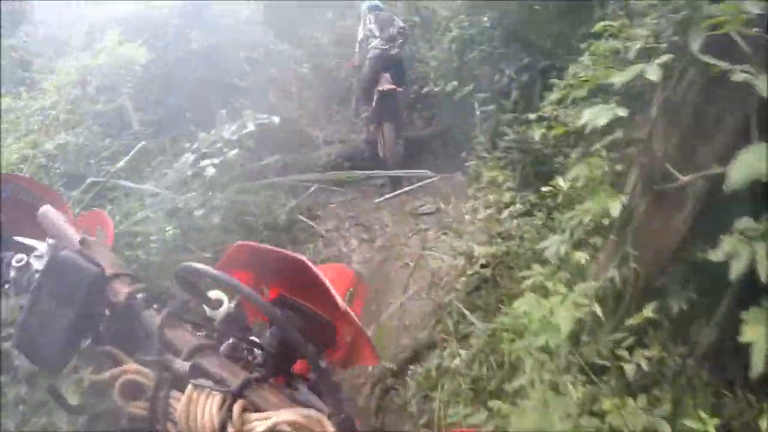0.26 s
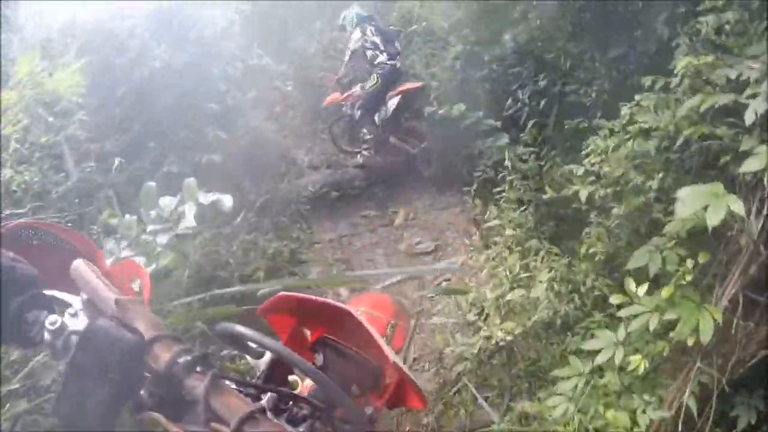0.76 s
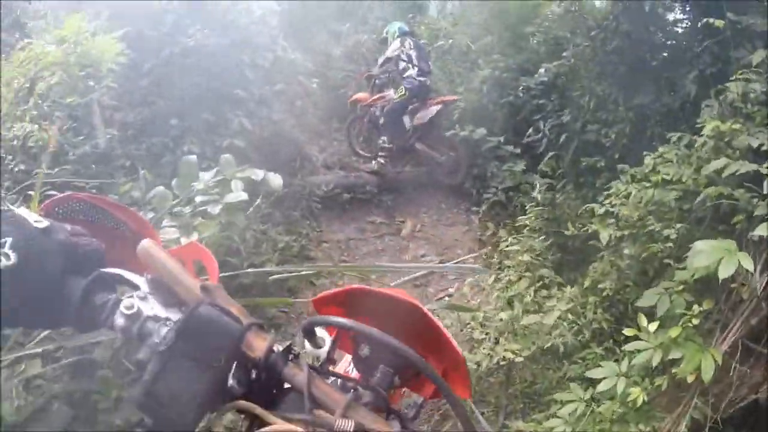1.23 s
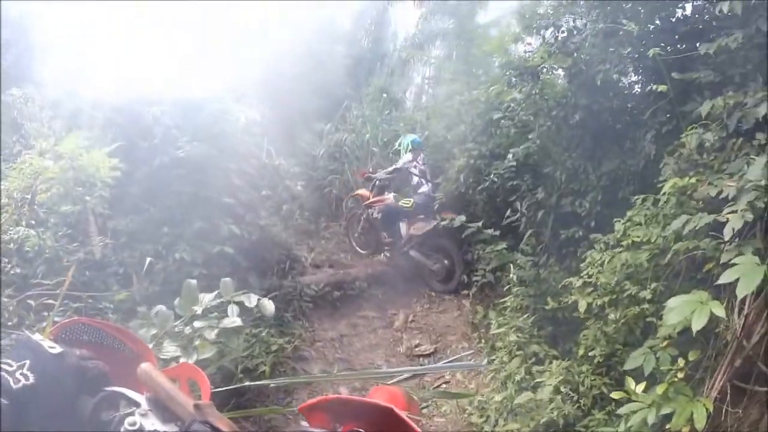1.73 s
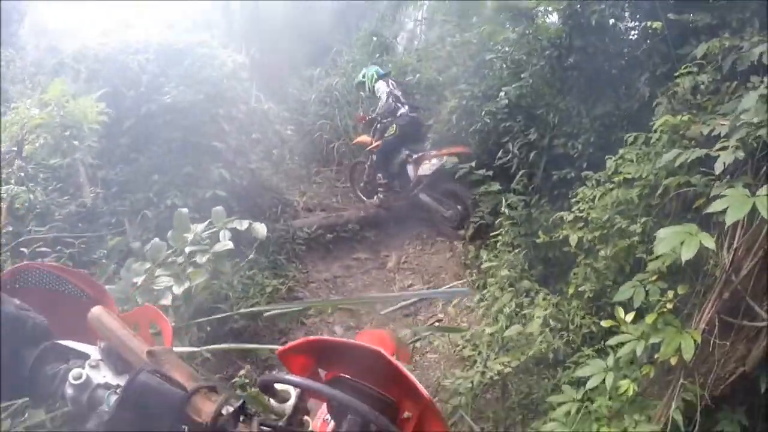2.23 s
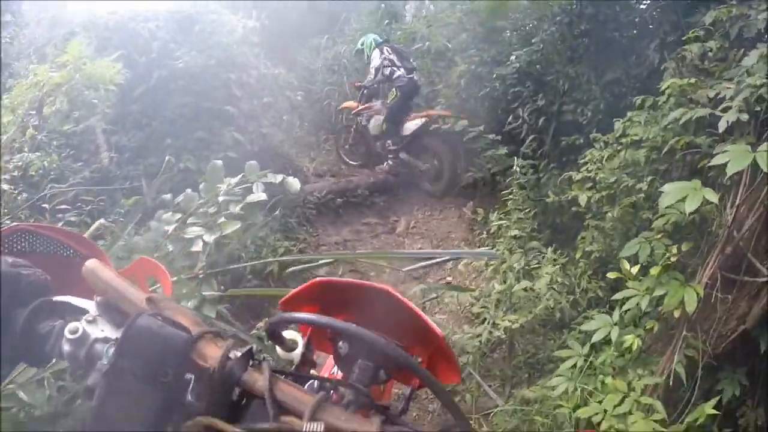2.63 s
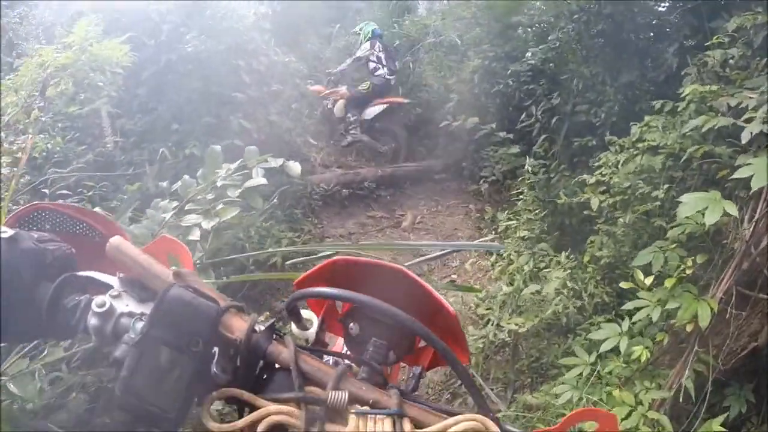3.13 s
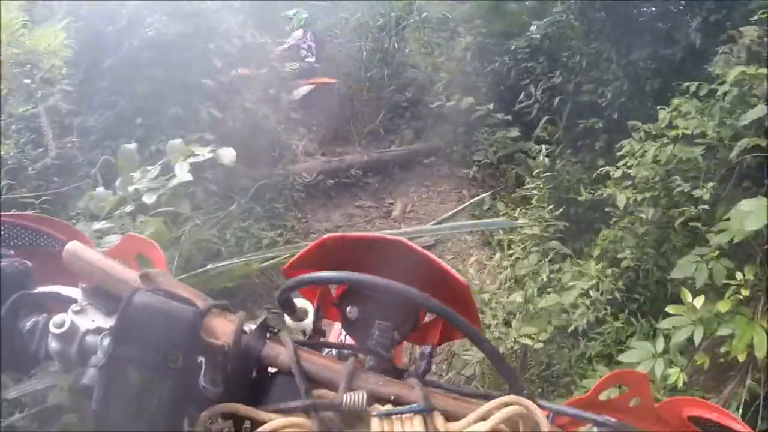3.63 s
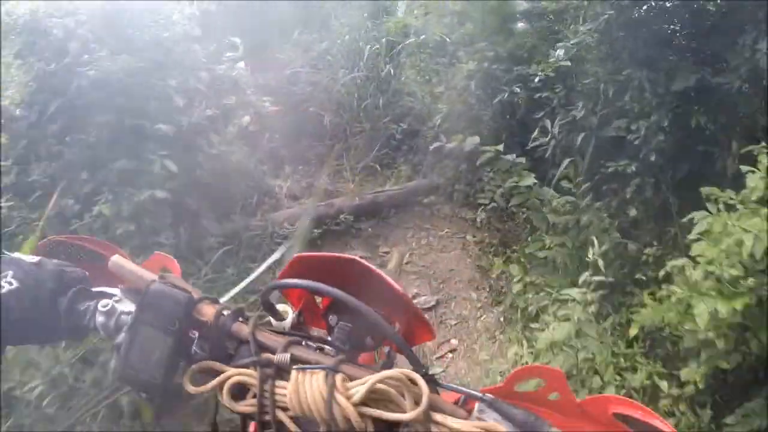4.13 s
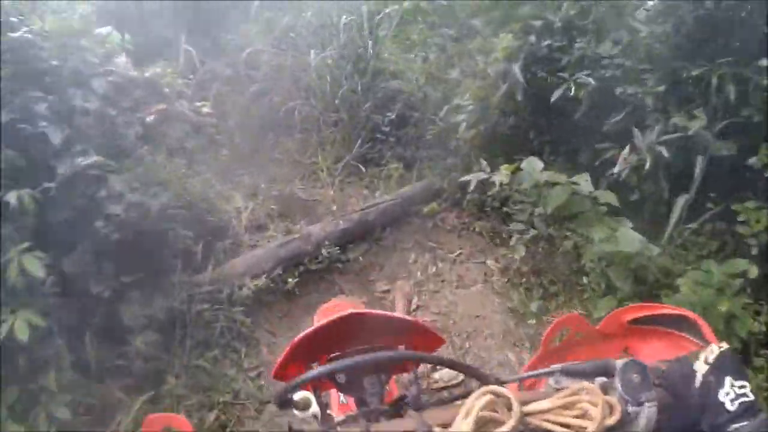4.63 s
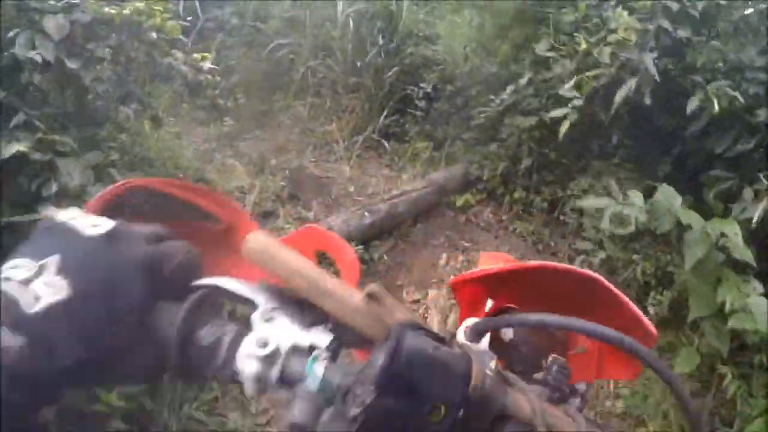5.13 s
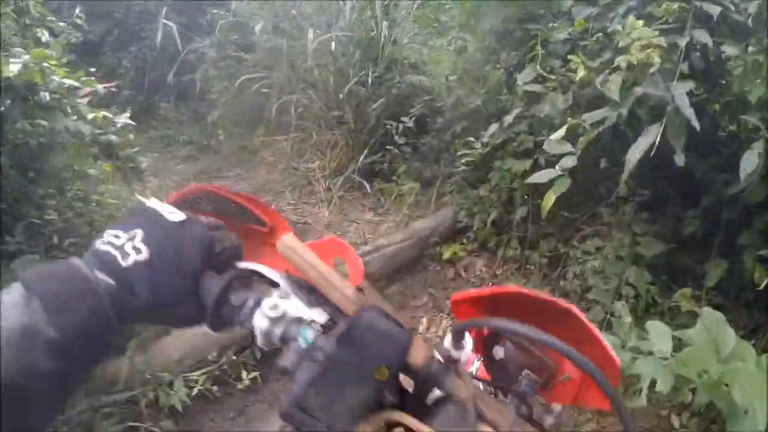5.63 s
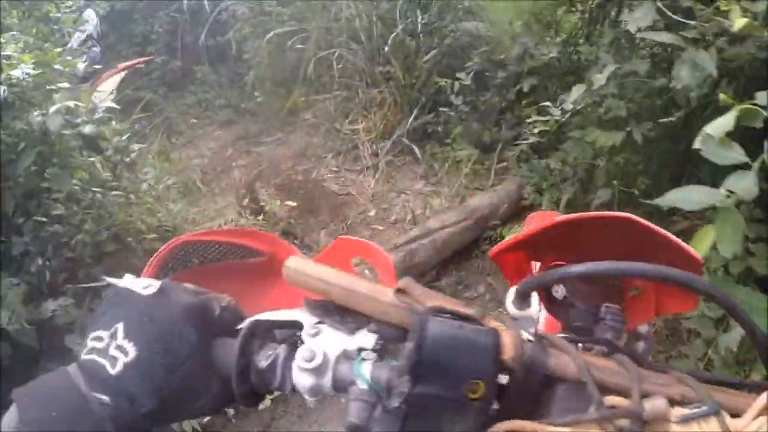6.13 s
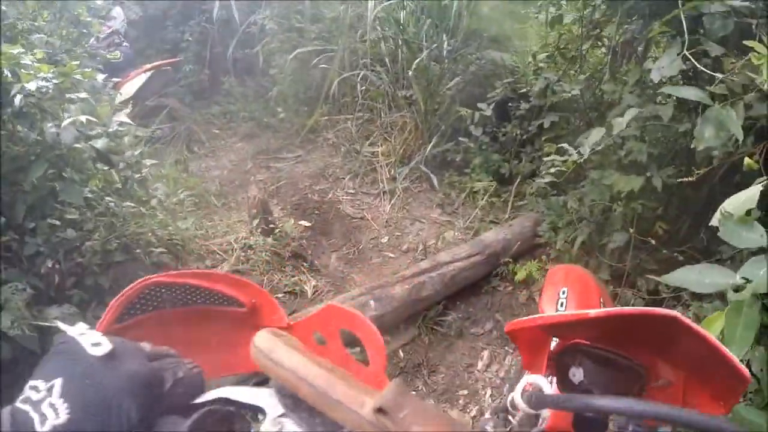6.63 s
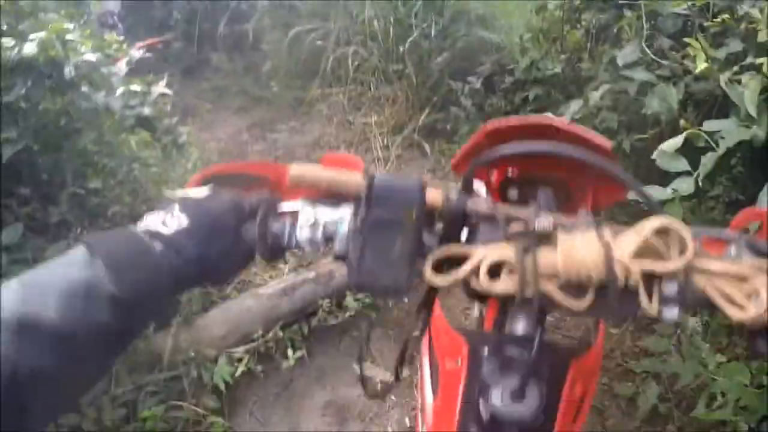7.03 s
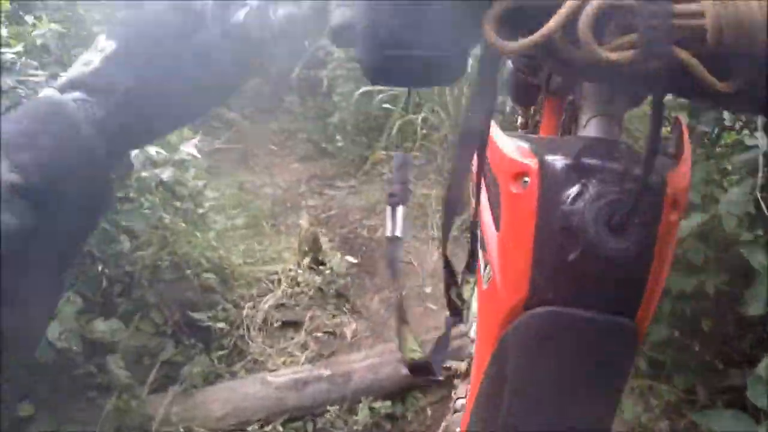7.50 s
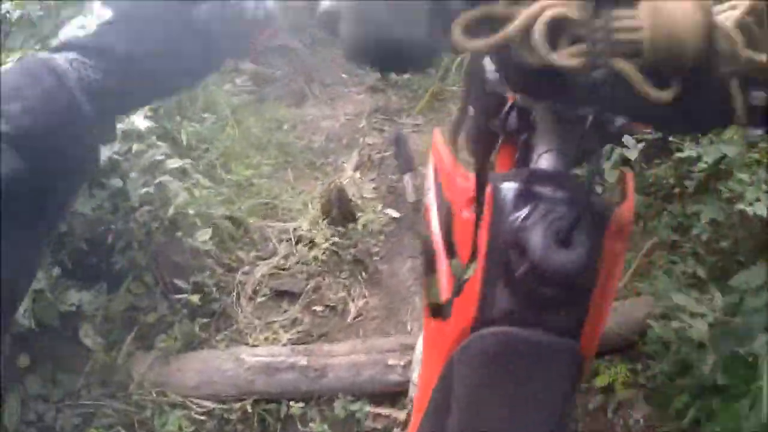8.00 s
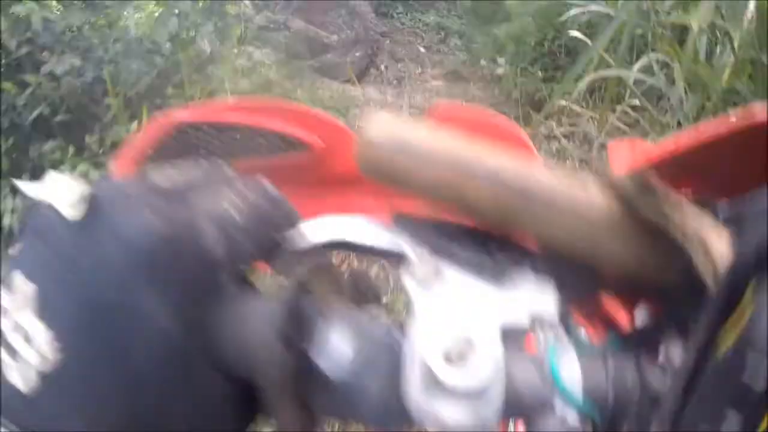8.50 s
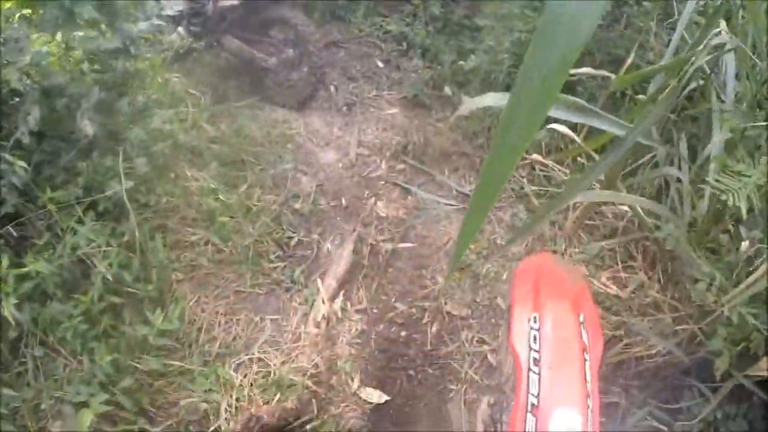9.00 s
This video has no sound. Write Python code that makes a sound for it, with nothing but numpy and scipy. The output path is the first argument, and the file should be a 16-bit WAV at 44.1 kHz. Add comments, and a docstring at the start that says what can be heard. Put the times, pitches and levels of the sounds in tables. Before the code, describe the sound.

Close dirt bike engine chugs at low speed as a second barks off into the distance, followed by throttle bursts, hard knocks and chain whirr.

```python
"""A two-stroke dirt bike idles and creeps up a forest trail, heard from a camera on its rider;
each firing thumps the exhaust and rattles the engine. A bike ahead barks over a log and is gone
by 3.5 s. A third buzzes far off from 1.4 s and again near 6 s. Then the near bike climbs the log:
it sways, clatters and thuds, the hardest knocks push the limiter down, and from 8 s the chain whirrs."""
import sys
import numpy as np
from scipy import signal
from scipy.fft import rfft, irfft
from scipy.io import wavfile
from scipy.ndimage import uniform_filter1d, minimum_filter1d

SR = 44100
rng = np.random.default_rng(int(sys.argv[2]) if len(sys.argv) > 2 else 0)


def transcribe(signal):
    """Save signal, clipped to [-1, 1], as a 16-bit WAV file at the path in sys.argv[1]."""
    frames = np.atleast_2d(signal).T
    limited = np.clip(frames, -1, 1)
    pcm = np.round(limited * 32767).astype(np.int16)
    wavfile.write(sys.argv[1], SR, pcm)


N = 408366

# far engine: (time [s], firing rate [Hz], level [dB])
FAR_ENGINE = [(1.4, 132, -72), (1.56, 133, -48.5), (1.72, 113, -44.5), (1.82, 122, -55), (1.88, 132, -51),
              (1.96, 127, -50), (2.11, 133, -47.5), (2.25, 141, -54), (2.36, 165, -49.5), (2.8, 150, -56),
              (3.1, 160, -87), (5.8, 130, -93), (5.94, 148, -50), (6.02, 172, -46.5), (6.25, 135, -58),
              (6.42, 140, -58), (6.66, 104, -60), (6.77, 136, -48), (6.95, 180, -70), (7.7, 181, -65),
              (7.8, 170, -55)]

# bike ahead, engine speed: (time [s], firing rate [Hz])
AHEAD_SPEED = [(0.0, 26.25), (0.34, 39.92), (0.55, 30.9), (0.66, 35.7), (0.74, 40.5), (0.83, 43),
               (0.97, 52), (1.1, 55.2), (1.3, 61.3), (1.43, 63.4), (1.64, 46.41), (2.22, 22.44),
               (2.39, 39.66), (2.62, 38.63), (2.72, 44.71), (2.86, 44.25), (3.12, 58.0), (3.42, 44.5)]
# its throttle: (opens [s], shuts [s], bark lift [dB], honk lift [dB])
AHEAD_THROTTLE = [(-0.05, 0.08, 7.5, 8), (0.255, 0.373, 13, 14.5), (0.62, 0.853, 11.5, 13.5),
                  (0.847, 1.37, 9, 10), (2.223, 2.42, 14.5, 6), (2.432, 2.624, 14.5, 14.5),
                  (2.59, 2.843, 15, 10), (2.82, 3.14, 13.5, 11)]
# its uneven firings, mostly hard: (time [s], gain [dB])
AHEAD_ACCENTS = [(0.335, 3.5), (0.358, 1.5), (0.650, 8.5), (0.705, 3), (0.73, -2.5), (0.823, 5), (1.03, 2),
                 (2.255, 4), (2.294, 0), (2.383, 2), (2.409, -4), (2.433, -0.5), (2.458, 2.5), (2.484, 2.5),
                 (2.638, 2), (2.686, 2), (2.709, 1.5), (2.731, 0.5), (2.844, -1)]
# its exhaust crack: (frequency [Hz], level [dB])
BARK_SPECTRUM = [(150, 5), (300, 20), (550, -3.5), (800, 1.5), (1300, 3.5), (1600, 6.5), (1900, 4),
                 (3100, 7), (4000, 1.5), (5800, 0), (7000, -11), (10000, -18.5), (15000, -29)]
# its pipe, mid and low resonances: (frequency [Hz], level [dB], t60 [s])
HONK_MODES = [(335, 4.5, 0.072), (380, 5.4, 0.042), (430, 2.1, 0.051)]
BOOM_MODES = [(130, 5.7, 0.066), (168, 3.5, 0.078)]

# camera jostle: (time [s], level [dB])
JOSTLE_LEVEL = [(0, -33.5), (1.2, -44), (4.3, -34.5), (4.9, -48), (5.25, -36), (6.6, -43), (7.05, -28),
                (7.55, -34.5), (7.95, -23.5), (8.5, -27), (9.26, -17)]
# sway of bike and rider: (time [s], peak [dB], frequency [Hz])
HEAVES = [(0.471, -23.5, 23.6), (0.911, -27.5, 22.9), (5.134, -10, 33.7), (5.191, -13.5, 21.1),
          (5.709, -20, 26), (7.725, -10, 31.4), (7.859, -24, 24.7), (8.173, -14, 28.5)]
# dull blows through the frame: (time [s], drive [dB], low-pass [Hz])
THUDS = [(0.513, -28, 191), (5.209, -19.5, 444), (7.2263, 1.5, 300), (7.344, -12.5, 80), (7.798, -25, 304),
         (7.888, -21, 216), (8.031, -17, 214), (8.531, -22, 500), (8.7739, 7.5, 274), (9.183, -12.5, 160)]
# housing contacts: (time [s], drive [dB], low-pass [Hz], t60 scale [x], grit [dB], grit decay [s])
CLACKS = [(1.668, -27.5, 5000, 0.77, -33, .0018), (3.948, -30, 4200, 1.2, -15, .003),
          (3.984, -23.5, 3700, 1.4, 3.5, 0.0052), (4.523, -32.5, 6000, 0.9, -16, .003),
          (4.683, -34, 7000, 2, -6.5, 0.0034), (4.748, -32.5, 6960, 0.74, -2, 0.0058),
          (5.206, -5.5, 12400, 0.49, -21, 0.0013), (7.224, 0, 2530, 0.58, -24, .002),
          (7.772, -13.5, 8100, 0.6, -25, 0.0013), (7.798, -22, 2600, 0.39, -7, .003),
          (7.888, -24.5, 2440, 0.48, -19, .003), (8.029, -19, 2130, 0.42, -16, .004),
          (8.431, -17, 2260, 1.2, -17, .002), (8.53, -6, 9900, 0.56, -19, .0018),
          (8.5354, -9.5, 3380, 0.61, -15, .0018), (8.7737, 16.5, 1920, 0.52, -16, 0.0013)]
# bike frame and camera housing: (frequency [Hz], level [dB], t60 [s])
FRAME_MODES = [(69, 0, 0.2), (136.6, -5.5, 0.14), (188, 7, 0.044), (236.7, 6.5, 0.077)]
HOUSING_MODES = [(812, -19.5, 0.056), (1545, -1, 0.032), (2110, -2.5, 0.019), (2495, -9, 0.039),
                 (3060, 1, 0.016), (4220, -6, 0.022), (4960, -14.5, 0.041), (6330, -20, 0.026),
                 (10650, -6, 0.0038)]

# near bike, engine speed: (time [s], firing rate [Hz])
NEAR_SPEED = [(0.0, 28.13), (0.14, 17.35), (0.73, 15.47), (1.02, 20.29), (1.58, 18.59), (2.24, 21.5),
              (2.54, 19.1), (3.34, 21.68), (3.42, 22.05), (3.5, 25.72), (3.68, 26.94), (3.85, 26.43),
              (4.15, 23.9), (4.52, 18.91), (4.7, 12.56), (4.85, 13.46), (5.08, 21.83), (5.17, 26.04),
              (5.32, 30.25), (5.5, 23.72), (5.63, 24.64), (5.75, 32.58), (5.82, 34.06), (5.95, 26.91),
              (6.2, 20.03), (6.35, 26.73), (6.46, 25.52), (6.65, 17.02), (6.9, 21.57), (7.03, 38.34),
              (7.11, 37.86), (7.2, 42.77), (7.32, 41.79), (7.56, 32.05), (7.88, 28.42), (8.0, 29.71),
              (8.11, 27.24), (8.294, 32.69), (8.36, 36.19), (8.446, 40.0), (8.564, 39.1), (8.616, 40.2),
              (8.718, 48.7), (8.774, 49.7), (8.93, 48.3), (9.04, 51.2), (9.26, 49.2)]
# its throttle; whine is low with the clutch pulled:
# (opens [s], shuts [s], exhaust lift [dB], clatter lift [dB], whine gain [dB])
NEAR_THROTTLE = [(-0.1, 0.03, 16.5, 7, -14), (0.145, 0.59, 11, 6.5, -35), (1.165, 3.42, 5.5, 3.5, -11),
                 (2.476, 2.904, 14.5, 7.5, -12), (3.35, 4.52, 14.5, 3.5, -5.5), (4.877, 5.1, 10, 2, -8),
                 (5.04, 5.32, 17.5, 3.5, 1), (5.32, 5.55, 16.5, 2, -25), (5.6, 5.852, 19.5, 6, -5),
                 (5.783, 6.046, 18.5, 3, -27), (6.189, 6.478, 17.5, 4, -17), (6.869, 7.357, 23, 9, -9.5),
                 (7.209, 7.657, 20.5, -1.5, -16), (7.87, 8.29, 21, 5, -7), (8.191, 8.62, 22.5, 9, -9.5),
                 (8.542, 8.726, 27, 10.5, -12.5), (8.734, 9.26, 20.5, 8.5, -13.5)]
# its odd firings, mostly misfires: (time [s], gain [dB])
NEAR_STUMBLES = [(0.255, 0.5), (0.435, -2), (2.14, -1), (2.35, -6), (2.68, -3), (4.65, -11), (4.72, -7),
                 (5.355, -7), (5.39, -7), (5.508, -24), (5.59, -15), (6.22, 1), (6.50, -9), (6.70, -8),
                 (6.76, 1), (7.55, -9), (7.68, -11), (8.12, -9)]
# chain whirr as the rear wheel spins up: (time [s], level [dB])
CHAIN_LEVEL = [(8.0, -56), (8.3, -44), (8.55, -47), (8.72, -34.5), (8.85, -31), (9.26, -33.5)]
# gear meshes: (teeth per crank turn [count], level [dB])
GEAR_MESHES = [(45, 9), (51, 5), (68, -12.5), (86, 3), (116, -11.5), (137, -8), (172, -6.5), (200, -11.5)]
# ringing of chain, airbox and pipe wall: (frequency [Hz], level [dB], t60 [s])
CHAIN_MODES = [(2240, 2, 0.03), (2490, 1, 0.015), (2750, 1, 0.022), (3110, 0, .014), (3390, -4, 0.019)]
AIRBOX_MODES = [(68, 2.8, 0.26), (98.3, 10.3, 0.12)]
PIPE_WALL_MODES = [(1053, -18.5, 0.18), (1450, 24, 0.028), (2190, 12, 0.089)]
# colour of exhaust pulse, crankcase, engine clatter and hiss: (frequency [Hz], level [dB])
EXHAUST_SPECTRUM = [(15, -47), (50, -14), (80, 1.5), (115, -10.5), (148, -5.5), (195, -19.5), (235, -12),
                    (264, 6.5), (290, 1.5), (325, -2.5), (360, -9.5), (415, -19), (470, -27), (560, -23),
                    (900, -50.5), (4000, -80)]
CRANKCASE_SPECTRUM = [(1000, -43), (1900, -13.5), (2280, -2.5), (2500, -3.5), (2850, 2), (3100, -2.5),
                      (3320, 0.5), (3650, -3.5), (4050, -7.5), (4450, -4.5), (4900, -21), (8000, -32)]
CLATTER_SPECTRUM = [(80, 10), (200, 12), (400, 4.5), (650, -4), (900, -5.5), (1100, 0), (1300, -6),
                    (1580, 10), (1850, -4.5), (2250, 3), (2700, 3.5), (3200, -1), (3700, -8), (4500, -17),
                    (6000, -56)]
HISS_SPECTRUM = [(2500, 3), (4300, 3), (5200, 0.5), (5900, 4), (6700, -4.5), (7700, -2.5), (8500, -8.5),
                 (9600, -6), (11500, -15), (13000, -17.5), (15500, -30)]

IDLE_HZ, CRUISE_HZ = 20, 40  # firing rates
TIME_S = np.arange(N) / SR


def from_db(db):
    """Decibels to gain."""
    return 10 ** (np.asarray(db) / 20)


def unit_rms(x):
    """Scale to rms 1."""
    return x / np.sqrt(np.mean(x ** 2) + 1e-20)


def curves(rows):
    """One per-sample curve for each column after time."""
    times_s, *columns = np.transpose(rows)
    return [np.interp(TIME_S, times_s, column) for column in columns]


def gate(rows):
    """1 over a table's time span, 0.1 s fades outside it."""
    inside_s = np.minimum(TIME_S - rows[0][0], rows[-1][0] - TIME_S)
    return np.clip(1 + inside_s / .1, 0, 1)


def noise(spectrum):
    """Noise coloured by (frequency [Hz], level [dB]), rms 1."""
    hz, db = np.transpose(spectrum)
    log_hz = np.log(np.fft.rfftfreq(N, 1 / SR) + 1)
    gain = from_db(np.interp(log_hz, np.log(hz), db, left=-70, right=-70))
    return unit_rms(irfft(rfft(rng.standard_normal(N)) * gain, N))


def lowpass(x, hz, order=2):
    """Butterworth low-pass."""
    return signal.sosfilt(signal.butter(order, hz, fs=SR, output="sos"), x + 1e-18)


def ring(x, modes):
    """Damped modes driven by x; neighbours alternate in sign."""
    out = 0
    for k, (hz, db, t60_s) in enumerate(modes):
        radius, step_rad = from_db(-60 / (t60_s * SR)), 2 * np.pi * hz / SR
        feedback = [1, -2 * radius * np.cos(step_rad), radius ** 2]
        out = out + (-1) ** k * from_db(db) * signal.lfilter([0, np.sin(step_rad)], feedback, x + 1e-18)
    return out


def resonate(x, spectrum, size=8192):
    """Minimum-phase body filter; its peaks ring on after each pulse."""
    hz, db = np.transpose(spectrum)
    log_hz = np.log(np.fft.rfftfreq(size, 1 / SR) + 1)
    cepstrum = irfft(np.log(from_db(np.interp(log_hz, np.log(hz), db))))
    causal = np.r_[cepstrum[0], 2 * cepstrum[1:size // 2]]
    response = irfft(np.exp(rfft(causal, size)))
    return signal.oaconvolve(x, response)[:N]


def decay(clicks, decay_s):
    """Exponential envelope from each click."""
    return signal.lfilter([1], [1, -np.exp(-1 / (decay_s * SR))], clicks + 1e-18)


def click_train(rate_hz, uneven_db, jitter_s):
    """One click per cycle, scattered in time and strength; equal power at any rate."""
    at = np.flatnonzero(np.diff(np.floor(np.cumsum(rate_hz) / SR)))
    timing, strength = rng.standard_normal((len(at), 2)).T
    jittered = np.clip(at + (timing * jitter_s * SR).astype(int), 0, N - 1)
    clicks = np.zeros(N)
    clicks[jittered] = from_db(uneven_db * strength) / np.sqrt(rate_hz[at])
    return clicks


def accented(clicks, accents):
    """Scale the firing nearest each listed time."""
    out, at = clicks.copy(), np.flatnonzero(clicks)
    for time_s, db in accents:
        out[at[np.argmin(np.abs(at - time_s * SR))]] *= from_db(db)
    return out


def throttle(opens_s, shuts_s, heights, rise_s, fall_s):
    """Each twist rises, holds and falls; the higher wins an overlap."""
    held = np.zeros(N)
    for open_s, shut_s, height in zip(opens_s, shuts_s, heights):
        ramp = np.minimum((TIME_S - open_s) / rise_s, 1 - (TIME_S - shut_s) / fall_s)
        held = np.maximum(held, height * np.clip(ramp, 0, 1))
    return held


def far_bike(harmonics_db=(-20, -10, 0, -4, -16, -16)):
    """Only a few harmonics of a fast engine carry through the trees."""
    rate_hz, level_db = curves(FAR_ENGINE)
    waver = .02 * noise([(2, 2), (40, -15.5)])
    crank_rad = 2 * np.pi * np.cumsum(rate_hz * (1 + waver)) / SR
    buzz = sum(from_db(db) * np.sin(k * crank_rad) for k, db in enumerate(harmonics_db, start=1))
    return from_db(level_db) * buzz * gate(FAR_ENGINE)


def ahead_levels(rate_hz, leaves_s=2.887, fade_db_per_s=38):
    """Throttle lifts bark and honk and chokes the boom; the brush swallows the first two as it leaves."""
    octaves = np.log2(rate_hz / CRUISE_HZ)
    opens_s, shuts_s, *lifts_db = np.transpose(AHEAD_THROTTLE)
    bark_lift_db, honk_lift_db = (throttle(opens_s, shuts_s, heights, rise_s=.07, fall_s=.29)
                                  for heights in lifts_db)
    coast_db = -44 + 8 * octaves - fade_db_per_s * np.maximum(TIME_S - leaves_s, 0)
    boom_db = -38.5 + 7 * octaves - .42 * bark_lift_db
    return coast_db + bark_lift_db, coast_db - 12 + honk_lift_db, boom_db


def bike_ahead(echo_s=.009, housing_db_per_db=.4, housing_ref_db=-31):
    """Its silencer points back: cracks, smeared by brush, ring the camera housing; its pipe honks."""
    rate_hz, = curves(AHEAD_SPEED)
    bark_db, honk_db, boom_db = ahead_levels(rate_hz)
    turns = click_train(rate_hz, uneven_db=1, jitter_s=.00005)
    firings = accented(turns, AHEAD_ACCENTS)
    rasp_share = np.interp(rate_hz, [37.3, 56], [0, .57])  # cracks merge at high revs
    echoed = firings + .15 * np.roll(firings, int(echo_s * SR))
    scatter = .04 * decay(firings, decay_s=.05)
    bursts = unit_rms(lowpass(decay(echoed, decay_s=.006) + scatter, hz=500))
    flutter = unit_rms(from_db(3 * noise([(20, 0), (300, 0), (600, -20)])))
    cracks = ((1 - rasp_share) * bursts + rasp_share * flutter) * noise(BARK_SPECTRUM)
    jolts = unit_rms(firings + .06 * rng.standard_normal(N) * decay(firings, decay_s=.004))
    shake = np.sqrt(1 - rasp_share) * jolts + rasp_share * flutter * rng.standard_normal(N)
    housing = unit_rms(ring(shake, [(1575, 0, .04), (1670, -3, .022)]))
    housing_db = -4 + housing_db_per_db * (bark_db - housing_ref_db)  # grows faster than the bark
    bark = from_db(bark_db) * (from_db(-5.5) * cracks + from_db(housing_db) * housing)
    honk = from_db(honk_db) * unit_rms(ring(turns, HONK_MODES))
    boom = from_db(boom_db) * unit_rms(ring(turns, BOOM_MODES))
    return (bark + honk + boom) * gate(AHEAD_SPEED)


def sway(peak_cycles=1.11):
    """Rough ground jostles the camera; bike and rider heave in low swells."""
    rumble = noise([(12, -8), (24, 0), (36, -11), (90, -20), (180, -35), (400, -54)])
    out = from_db(curves(JOSTLE_LEVEL)[0]) * rumble
    for start_s, db, hz in HEAVES:
        cycles = np.maximum(TIME_S - start_s, 0) * hz
        age = cycles / peak_cycles
        swell = age ** 2 * np.exp(2 * (1 - age))
        out += from_db(db) * swell * np.sin(2 * np.pi * cycles)
    return out


def frame_thuds():
    """Dull blows ring the frame, all modes with the same sign."""
    blows = sum(from_db(db) * lowpass(signal.unit_impulse(N, int(time_s * SR)), hz)
                for time_s, db, hz in THUDS)
    return sum(ring(blows, [mode]) for mode in FRAME_MODES)


def housing_clacks(size=8192, grit_above_hz=1400):
    """Each contact rings the housing with its own damping and drags a rattle of grit."""
    out = np.zeros(N + size)
    highpass = signal.butter(2, grit_above_hz, "high", fs=SR, output="sos")
    for time_s, drive_db, cutoff_hz, t60_scale, grit_db, grit_s in CLACKS:
        modes = [(hz, db, t60_s * t60_scale) for hz, db, t60_s in HOUSING_MODES]
        body = ring(signal.unit_impulse(size), modes)
        grit = signal.sosfilt(highpass, rng.standard_normal(size) * np.exp(-TIME_S[:size] / grit_s))
        clack = lowpass(body + from_db(grit_db) * grit, cutoff_hz, order=4)
        start = int(time_s * SR)
        out[start:start + size] += from_db(drive_db) * clack
    return out[:N]


def drive_chain(links_per_turn=7):
    """Rollers strike the sprocket unevenly and ring as a gritty whirr."""
    rate_hz, = curves(NEAR_SPEED)
    strikes = click_train(links_per_turn * rate_hz, uneven_db=3.5, jitter_s=.0005)
    whirr = unit_rms(ring(np.diff(strikes, prepend=0), CHAIN_MODES))
    return from_db(curves(CHAIN_LEVEL)[0]) * whirr * gate(CHAIN_LEVEL)


def gear_whine(rate_hz, puff, kick_hz2=66):
    """The crank leaps at each firing, then slows: a falling chirp per turn, frayed by backlash."""
    turn_phase = np.cumsum(rate_hz) / SR % 1
    kick = kick_hz2 / rate_hz ** 2 * lowpass(.5 - turn_phase, hz=150)
    backlash = .027 * noise([(5, -8), (40, 0), (300, 0), (700, -30)]) * (rate_hz / CRUISE_HZ) ** 2
    crank_rad = 2 * np.pi * np.cumsum(rate_hz * (1 + kick + backlash)) / SR
    mesh = sum(from_db(db) * np.sin(teeth * crank_rad) for teeth, db in GEAR_MESHES)
    roughness = 1 + .46 * noise([(5, 0), (120, 0), (400, -20)])
    pressure = (.45 + np.sin(np.pi * turn_phase)) * roughness
    return resonate(mesh * unit_rms((2 + puff) * pressure), CRANKCASE_SPECTRUM)


def engine_knock(turns, decay_s=.02, size=2048):
    """Piston and chain knock the same way on every turn."""
    knock = noise(CLATTER_SPECTRUM)[:size] * np.exp(-TIME_S[:size] / decay_s)
    return unit_rms(signal.oaconvolve(turns, knock)[:N])


def near_exhaust(turns, puff, wall_db=-20.5, gas_db=-24):
    """Each firing thumps the silencer, rings the pipe wall and puffs gas."""
    firings = accented(turns, NEAR_STUMBLES)
    thump = unit_rms(resonate(firings, EXHAUST_SPECTRUM))
    wall = unit_rms(ring(firings, PIPE_WALL_MODES))
    gas = unit_rms(puff * noise([(60, 18), (130, 15), (200, -17), (450, -17), (900, -58)]))
    return thump + from_db(wall_db) * wall + from_db(gas_db) * gas


def near_levels(octaves):
    """Throttle lifts exhaust, clatter, hiss and whine; clatter and hiss also rise with speed."""
    opens_s, shuts_s, exhausts_db, clatters_db, whines_db = np.transpose(NEAR_THROTTLE)
    lift_db, strain_db, gear_load = (throttle(opens_s, shuts_s, heights, rise_s=.1, fall_s=.17)
                                     for heights in (exhausts_db, clatters_db, from_db(whines_db)))
    exhaust_db = -50 + lift_db
    clatter_db = -44.95 + 2.5 * octaves + strain_db
    hiss_db = -56 + 3 * octaves + 1.22 * strain_db
    return exhaust_db, clatter_db, hiss_db, gear_load


def near_bike():
    """One firing per crank turn pulses exhaust, airbox, knock, rattle, gears and hiss."""
    rate_hz, = curves(NEAR_SPEED)
    octaves = np.log2(rate_hz / IDLE_HZ)
    exhaust_db, clatter_db, hiss_db, gear_load = near_levels(octaves)
    turns = click_train(rate_hz, uneven_db=.5, jitter_s=.00003)
    puff = unit_rms(lowpass(decay(turns, decay_s=.016), hz=130))
    throb = unit_rms(2.3 + puff)
    exhaust = from_db(exhaust_db) * near_exhaust(turns, puff)
    airbox = from_db(-26 + .32 * exhaust_db) * unit_rms(ring(turns, AIRBOX_MODES))
    knock = from_db(-11 + 7 * octaves) * engine_knock(turns)  # a pitched buzz at high revs
    rattle = throb * noise(CLATTER_SPECTRUM)
    whine = from_db(5) * gear_load * gear_whine(rate_hz, puff)
    hiss = from_db(hiss_db) * throb * noise(HISS_SPECTRUM)
    return exhaust + airbox + from_db(clatter_db) * (knock + rattle + whine) + hiss


def scene():
    """Three engines, the chain and the bumps of the trail; mono."""
    bikes = near_bike() + drive_chain() + bike_ahead() + far_bike()
    bumps = sway() + frame_thuds() + housing_clacks()
    return (bikes + bumps)[None]


def record(dry, ceiling=1.193, release_db_per_s=22, cutoff_hz=15500):
    """A limiter ducks just ahead of each overload and recovers slowly; the top is cut."""
    over_db = 20 * np.log10(np.maximum(np.abs(dry[0]) / ceiling, 1))
    recovery_db = release_db_per_s * TIME_S
    reduction_db = np.maximum.accumulate(over_db + recovery_db) - recovery_db
    gain_db = uniform_filter1d(minimum_filter1d(-reduction_db, size=800), size=90)
    top_cut = signal.ellip(10, .1, 90, cutoff_hz, fs=SR, output="sos")
    return signal.sosfilt(top_cut, dry * from_db(gain_db))


dry = scene()
out = record(dry)
transcribe(out)
```